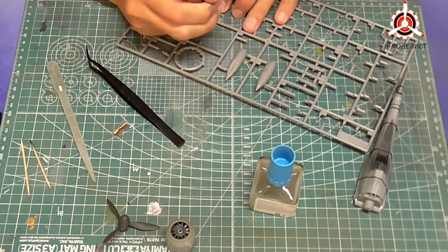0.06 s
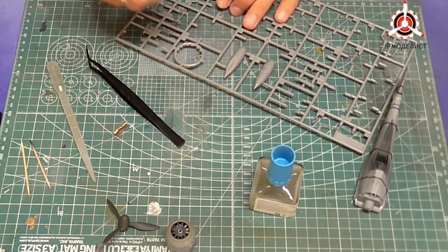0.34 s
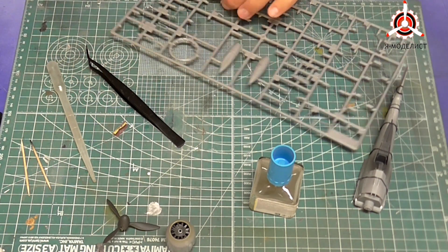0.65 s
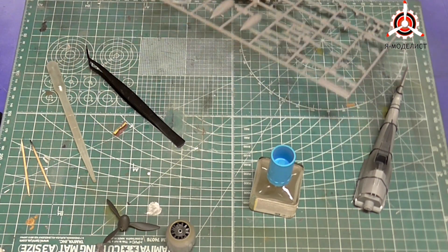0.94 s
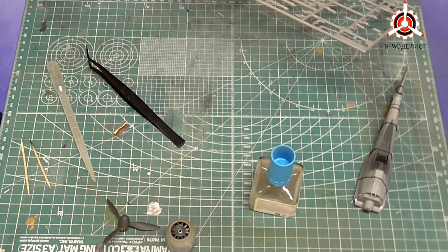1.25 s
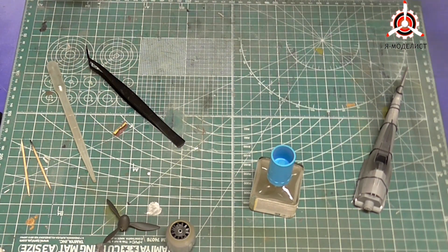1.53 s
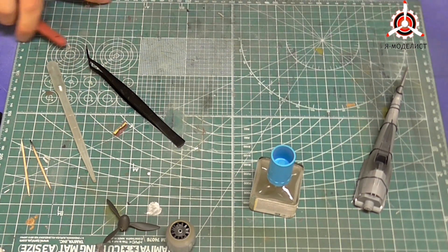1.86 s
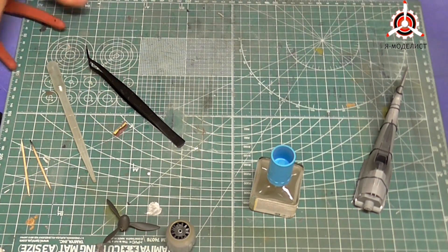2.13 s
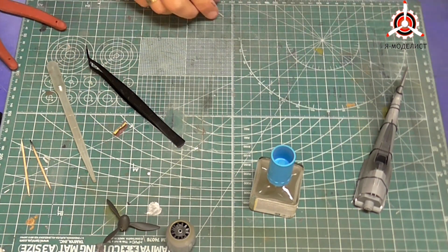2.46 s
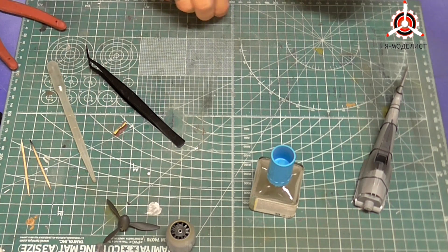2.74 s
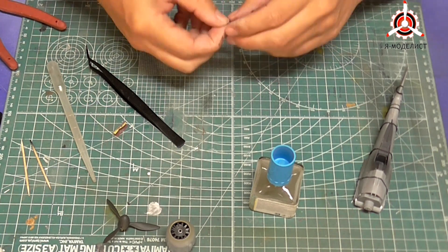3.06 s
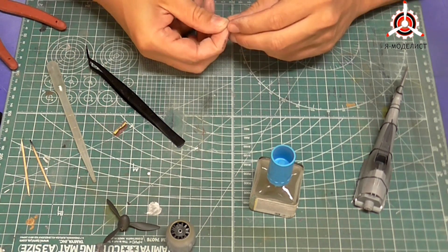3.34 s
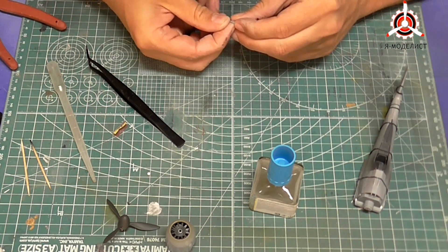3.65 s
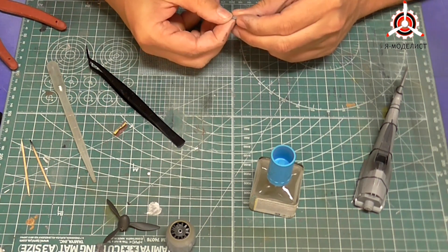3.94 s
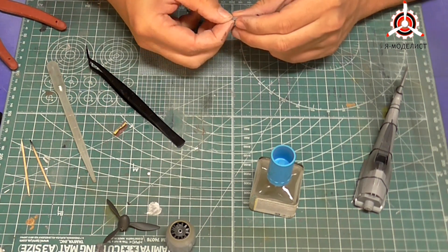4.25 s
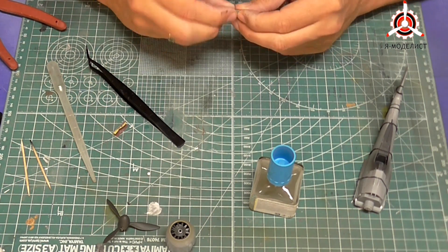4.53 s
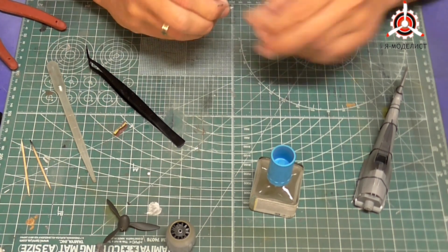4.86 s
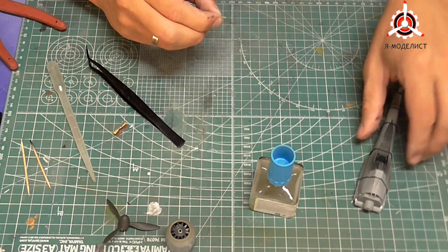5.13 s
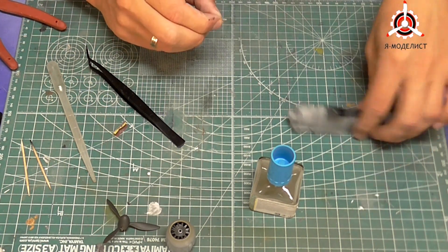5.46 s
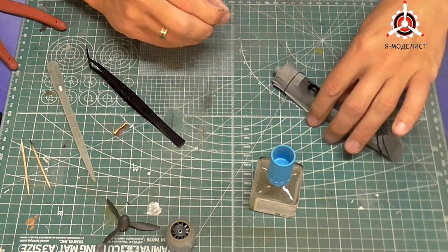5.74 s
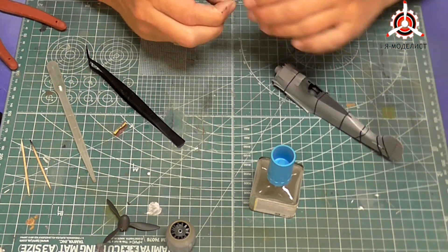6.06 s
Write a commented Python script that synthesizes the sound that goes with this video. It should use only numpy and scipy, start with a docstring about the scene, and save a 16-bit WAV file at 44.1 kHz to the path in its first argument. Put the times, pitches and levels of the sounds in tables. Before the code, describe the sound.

Small plastic clicks lead into a light, rasping slide of a model parts frame over a mat. Then comes the loudest sound, metal nippers clacking and thudding on the bench in quick bounces. Faint skin rubs and dull taps follow, until a hand lands on a plastic tool with a soft boom and swings it round, scraping and snapping. A close stereo microphone picks up steady hiss and the small room's rumble and echo.

```python
"""A modeller's bench in a small, echoing room. A sprue (the plastic frame that holds model parts) ticks
and scrapes as it is dragged off the cutting mat. Steel nippers are tossed aside and bounce to rest,
making the bench ring. Fingers fit two tiny parts, then a rotary tool is grabbed, making the room boom,
and slid over the mat. Each scrape is a stream of tiny slips; each bounce is a push and fading tones.
Under it all lie a low room rumble and the hiss of a close stereo microphone."""
import sys
import numpy as np
from scipy import signal
from scipy.fft import rfft, irfft
from scipy.io import wavfile

SR = 44100
rng = np.random.default_rng(int(sys.argv[2]) if len(sys.argv) > 2 else 0)


def pcm_store(signal):
    """Save signal as 16-bit PCM."""
    levels = np.round(np.clip(np.atleast_2d(signal), -1, 1) * 32767)
    wavfile.write(sys.argv[1], SR, levels.astype(np.int16).T)


N = 269010
T = np.arange(N) / SR
LEFT_RIGHT = np.array([[1], [-1]])  # adds to the left ear, takes away from the right

# Levels in the tables are relative: the functions set the final loudness.
# Tone colours, or how strong each pitch is. Each row: frequency in Hz, level in dB.
BACKGROUND_COLOUR = [(20, -9), (55, -10.5), (100, 1.5), (160, -0.5), (250, -3.5), (450, -8.5), (1000, -14),
                     (2000, -18), (2900, -26), (3900, -18.5), (5400, -22.5), (8200, -23), (12500, -24),
                     (15700, -27)]  # room rumble and microphone hiss
RUSH_COLOUR = [(18, -49), (30, -22), (168, -10.5), (213, -9.5), (263, -10), (332, -11.5), (532, -12),
               (1290, -17.5), (2990, -32.5), (3880, -31), (15500, -38.5)]  # a soft, wide rush
SPRUE_COLOUR = [(120, -14.5), (250, -9.5), (370, -4), (560, -11), (850, -8), (1100, -1), (1400, 4),
                (2000, -2), (2700, -6), (3500, -8.5), (4600, -6.5), (6200, -2.5), (9000, -8.5),
                (15500, -17.5)]  # plastic frame on the mat
BRUSH_COLOUR = [(150, 10), (540, -32), (1000, -3), (1900, -6.5), (2600, -13.5), (3300, -12), (7500, -1),
                (15500, -10)]  # skin on the mat
RUB_COLOUR = [(70, 12.5), (150, -13.5), (320, 1), (520, -5), (700, -11.5), (1150, -4.5), (1600, -14),
              (2800, -32.5), (15500, -42)]  # rubbing fingers
THUD_COLOUR = [(30, -20), (70, -5), (120, -5.5), (250, -0.5), (550, -1), (1000, -5.5), (1600, -6),
               (3000, -42.5), (9000, -39)]  # a blow on the bench
CLACK_COLOUR = [(100, -20), (600, -8), (1400, 0), (2200, -1), (3000, 1), (5000, 0), (7000, 0), (8200, -5),
                (9500, -12), (11000, -14), (16000, -25)]  # a blow on steel
TOOL_COLOUR = [(120, -25.5), (330, -4.5), (600, -11), (1000, -4.5), (1600, 2), (2700, -3.5), (3600, -2),
               (5600, 4), (7800, 0.5), (9200, -1), (10500, -4.5), (15500, -17)]  # the tool's housing on the mat

# Narrow ranges of pitch that stand out. Each row: centre in Hz, width in Hz, boost in dB.
BUZZ_PEAKS = [(4520, 81, 2.7), (6340, 610, 1.86), (9520, 850, 1.8), (11240, 200, 2.2)]
SPRUE_PEAKS = [(310, 17, 9.2), (770, 130, 5.8), (1053, 11, 8.2), (1310, 83, 1.2), (2030, 52, 6.3),
               (3400, 110, 3.8)]
TOOL_PEAKS = [(860, 50, 4), (1400, 80, 4), (2170, 130, 7), (3550, 200, 3), (5300, 150, 3), (5750, 280, 4.5),
              (8700, 450, 4)]

# Short strokes. Each row: start in seconds, length in seconds, level in dB.
SPRUE_NUDGES = [(-.05, 0.086, -49), (.37, 0.095, -58.5)]  # small pushes before the drag
FINGER_SWISHES = [(.27, .13, -68), (.5, 0.1, -60)]  # a fingertip along the sprue
SKIN_BRUSHES = [(1.825, 0.065, -63.5), (3.005, 0.13, -71)]  # skin across the mat
# Fingers rub, then a forearm shifts.
# Each row: start in seconds, length in seconds, level in dB, rumble in dB compared with the middle range.
RUBS = [(2.723, 0.054, -60, -11), (3.205, 0.069, -61, 9), (3.325, .1, -62.5, 5), (4.94, 0.059, -67, -4),
        (5.017, 0.059, -69, 17)]

# Long slides. Each row: time in seconds, level in dB, treble in dB compared with the middle range.
SPRUE_DRAG = [(.66, -57.5, -29), (.74, -57.5, -2.5), (.795, -49.5, -9), (.87, -57, -4), (.925, -45, -11.5),
              (1.015, -47, -11.5), (1.06, -41.5, -6.5), (1.11, -52.5, -23), (1.22, -56.5, -13),
              (1.4, -78.5, 12)]
TOOL_SWING = [(5.31, -57, -5), (5.37, -48, -4.5), (5.43, -46, 5.5), (5.485, -41.5, -7), (5.545, -50, -5),
              (5.565, -44, -6), (5.63, -49.5, -3), (5.745, -44, 1.5), (5.8, -69, 0)]
# The sliding sprue sings thinly. Each row: time in seconds, pitch in Hz, level in dB.
SPRUE_SINGING = [(.7, 2020, -64), (1.1, 2006, -65), (1.3, 2022, -63), (1.7, 2022, -70.5), (1.8, 2000, -70),
                 (1.95, 1940, -81)]

# Small contacts. Each row: start in seconds, level in dB, centre pitch in Hz, width in octaves.
PLASTIC_TICKS = [(.263, -57, 1630, 0.66), (.408, -52.5, 1210, 1.4), (.537, -56, 1620, 0.61),
                 (.624, -51.5, 2030, 0.28), (.852, -53.5, 775, 0.11), (1.045, -50, 1350, 0.27),
                 (1.079, -48, 1314, 0.12), (2.661, -52.5, 1870, 0.56), (2.7404, -53, 1050, 0.71)]  # thin parts
DULL_KNOCKS = [(.01, -48, 151, 1.6), (.691, -49.5, 330, 1.04), (3.222, -50, 780, 1.17),
               (3.622, -48.5, 476, 2.53), (3.638, -46, 276, 2.1), (4.08, -56, 209, 1.08),
               (4.124, -59, 215, 1), (4.984, -53.5, 278, 3), (5.067, -50.5, 90, 1.6),
               (5.47, -45, 347, 0.86), (5.514, -46.5, 326, 1.3), (5.833, -49, 275, 0.96)]  # fingers and tool on the bench
# A plastic edge catches and snaps free. Each row: start in seconds, level in dB, lowest pitch in Hz.
EDGE_SNAPS = [(.692, -56.5, 1000), (.783, -55, 1000), (1.159, -53.5, 900), (5.475, -37.5, 4400),
              (5.479, -35.5, 4050), (5.556, -44.5, 1200)]

# The nippers land. Each row: start in seconds, bench thud in dB, steel clack in dB,
# and the frequency in Hz above which the clack is dulled.
BOUNCES = [(2.028, -27, -23, 10070), (2.0425, -20.5, -34, 4970), (2.083, -19, -48, 2470),
           (2.111, -37, -53, 2500), (2.1628, -23, -23.5, 6540), (2.19, -17.5, -36, 9000),
           (2.222, -21.5, -21.5, 9000), (2.276, -19.5, -41, 3500), (2.289, -30.5, -23.5, 5570)]
# The hand lands on the rotary tool. Each row: start in seconds, level in dB.
GRAB_PUSHES = [(5.2629, -36), (5.28, -41)]

# Tones that ring on after a blow. Each row: pitch in Hz, level in dB, seconds to fade by 60 dB.
BENCH_TONES = [(134, -2, .45), (158, -1, .5), (192, -4, .4), (263, -4, .4), (322, -2, .55), (377, -6, .55),
               (427, 0, .55), (492, -2, .5), (563, -4, .45), (703, -9, .35), (833, -8, .3), (926, -4, .4),
               (1038, -3, .5)]
STEEL_TONES = [(1276, -3, .3), (1421, 1, .35), (1475, -2, .25), (1550, -2, .25), (1675, -5, .3),
               (2700, -1, .2), (2957, -2, .25), (3160, -1, .2), (4045, -1, .2), (4520, -3, .2),
               (4908, 0, .2), (5262, -2, .2), (6070, -4, .15), (6760, 0, .15), (7490, -5, .15)]  # jaws and spring
ROOM_BOOM_TONES = [(128.5, 11.5, 0.87), (221, -12, .14), (420, -8, 0.43), (770, 4.5, 0.3)]  # the room's low boom after the grab

# How long the room echoes. Each row: frequency in Hz, seconds to fade by 60 dB (called t60 below).
ROOM_FADE = [(100, .55), (500, .55), (1600, .62), (4500, .56), (8000, .45), (15000, .31)]
# How wide the echoes are. Each row: frequency in Hz, level in dB of the part that is opposite
# in the two ears, compared with the part they share.
ROOM_WIDTH = [(100, -13), (250, -13), (500, -9), (1000, -7.5), (4000, -6.5), (8000, -3), (14000, -2)]


def gain(db):
    """Turn decibels into a number to multiply by."""
    return 10 ** (np.asarray(db) / 20)


def unit_power(x):
    """Scale a steady sound to an average power of one."""
    return x / np.sqrt(np.mean(x ** 2))


def unit_hit(x):
    """Give a short sound the energy of 10 ms at a power of one."""
    return x * np.sqrt(SR / 100 / np.sum(x ** 2))


def value_at(points, hz):
    """Read between (Hz, value) rows, with every octave equally wide."""
    row_hz, values = np.transpose(points)
    return np.interp(np.log(hz + 1e-3), np.log(row_hz), values)


def frequencies(x):
    """The frequencies in the spectrum of x, in Hz."""
    return np.fft.rfftfreq(len(x), 1 / SR)


def peak_gain(peaks, hz):
    """A bell-shaped boost around each peak."""
    return gain(sum(db * np.exp(-((hz - centre) / width) ** 2) for centre, width, db in peaks))


def colour(x, points, peaks=()):
    """Give a sound a tone colour, with any peaks on top."""
    hz = frequencies(x)
    return irfft(rfft(x) * gain(value_at(points, hz)) * peak_gain(peaks, hz), len(x))


def band(x, hz, kind="bandpass", order=2):
    """Keep what lies between two frequencies, or below or above one."""
    edges_hz = np.sort(np.clip(np.atleast_1d(hz), 10, SR / 2 - 100)).squeeze()
    return signal.sosfilt(signal.butter(order, edges_hz, kind, fs=SR, output="sos"), x)


def burst(t60):
    """A second of fading noise with an energy of one."""
    noise = rng.standard_normal(SR) * np.exp(-np.log(1000) * T[:SR] / t60)
    return noise / np.sqrt(np.sum(noise ** 2))


def echoes(early_db=-3, early_t60=0.072, build_s=0.0009):
    """Quick echoes come from bench and shelves, then a tail from the walls, whose treble dies first."""
    noise = rng.standard_normal(SR)
    spectrum, centres_hz = rfft(noise), np.geomspace(100, 16000, 8)
    tail = 0
    for hz, share in zip(centres_hz, np.eye(len(centres_hz))):
        noise_band = irfft(spectrum * value_at(np.c_[centres_hz, share], frequencies(noise)), SR)
        tail = tail + noise_band * np.exp(-np.log(1000) * T[:SR] / value_at(ROOM_FADE, hz))
    tail = tail * (1 - np.exp(-T[:SR] / build_s))
    return tail / np.sqrt(np.sum(tail ** 2)) + gain(early_db) * burst(early_t60)


def room(x, echo_db, pan_db):
    """A sound plus its echoes, in stereo. A positive pan moves it to the left."""
    response = echoes() + LEFT_RIGHT * colour(echoes(), ROOM_WIDTH)
    reflected = signal.fftconvolve(x[None], response, axes=1)[:, :N]
    return (x + gain(echo_db) * reflected) * gain(LEFT_RIGHT * pan_db / 2)


def background(hiss_db=-63, rush_db=-60, buzz_db=-74, mains_hz=50, buzz_fade_s=0.0035):
    """Room rumble, microphone hiss, a faint mains buzz, and a soft rush opposite in the two ears."""
    rumble_and_hiss = unit_power(colour(rng.standard_normal(N), BACKGROUND_COLOUR))
    rush = unit_power(colour(rng.standard_normal(N), RUSH_COLOUR))
    # a few narrow bands of hiss swell on every cycle of the mains power
    swell = .7 + np.exp(-(T % (1 / mains_hz)) / buzz_fade_s)
    pulsing = rng.standard_normal(N) * swell
    peaks_only = peak_gain(BUZZ_PEAKS, frequencies(T)) - 1
    buzz = unit_power(irfft(rfft(pulsing) * peaks_only, N))
    return gain(hiss_db) * rumble_and_hiss + gain(buzz_db) * buzz + gain(rush_db) * LEFT_RIGHT * rush


def strokes(rows, rise_s=0.024, fade_s=0.021):
    """The loudness of short strokes: each rises, holds and dies away."""
    loudness = np.zeros(N)
    for start, length, db in rows:
        rise = np.clip((T - start) / rise_s, 0, 1)
        fade = np.exp(-np.maximum(T - start - length, 0) / fade_s)
        loudness += gain(db) * rise * fade
    return loudness


def drag(rows, edge_s=0.031):
    """The loudness of a long slide, and its treble in dB, from moment to moment."""
    times, db, treble_db = np.transpose(rows)
    touching = np.interp(T, [times[0] - edge_s, times[0], times[-1], times[-1] + edge_s], [0, 1, 1, 0])
    return touching * gain(np.interp(T, times, db)), np.interp(T, times, treble_db)


def friction(tone, rumble_db, treble_db, slips_per_s, spread_db, judder_db, peaks=(), judder_hz=90):
    """Tiny slips shake a sliding thing, swelling and fading as it catches and lets go."""
    sizes = gain(spread_db * np.minimum(rng.exponential(size=N), 3))
    slips = (rng.random(N) < slips_per_s / SR) * rng.choice([-1, 1], N) * sizes
    catching = np.tanh(np.interp(T * judder_hz, np.arange(N), rng.standard_normal(N)))
    body = colour(slips * gain(judder_db * catching), tone, peaks)
    rumble = unit_power(band(body, [90, 700], order=4))
    middle = unit_power(band(body, [700, 4000], order=4))
    treble = unit_power(band(body, 4000, "highpass", order=4))
    return middle + gain(rumble_db) * rumble + gain(treble_db) * treble


def sprue_singing(waver_hz=80):
    """One bar of the sliding frame rasps: a narrow band of noise around a drifting pitch."""
    times, hz, db = np.transpose(SPRUE_SINGING)
    waver = band(rng.standard_normal(N) + 1j * rng.standard_normal(N), waver_hz, "lowpass")
    phase = 2 * np.pi * np.cumsum(np.interp(T, times, hz)) / SR
    rasp = unit_power(np.real(waver * np.exp(1j * phase)))
    return rasp * np.interp(T, times, gain(db), left=0, right=0)


def sprue(nudge_treble_db=-4, swish_hz=(5700, 6900)):
    """The plastic frame scrapes over the mat, less boomy the faster it goes; skin swishes along it."""
    speed, treble_db = drag(SPRUE_DRAG)
    speed = speed + strokes(SPRUE_NUDGES)
    treble_db = np.where(T < SPRUE_DRAG[0][0], nudge_treble_db, treble_db)
    slowness_db = -20 * np.log10(np.maximum(speed / speed.max(), .1))
    scrape = speed * friction(SPRUE_COLOUR, rumble_db=-10.5 + 0.59 * slowness_db, treble_db=treble_db,
                              slips_per_s=1519, spread_db=2, judder_db=3, peaks=SPRUE_PEAKS)
    singing = sprue_singing()
    narrow_hiss = unit_power(band(rng.standard_normal(N), swish_hz))
    broad_hiss = unit_power(band(rng.standard_normal(N), [4500, 12000]))
    swish = strokes(FINGER_SWISHES) * (narrow_hiss + gain(1) * broad_hiss)
    return room(gain(-3.5) * scrape + swish + gain(-8.5) * singing, echo_db=-2.5, pan_db=0)


def rattle(x, t60):
    """Spread a blow over a quick run of tiny contacts."""
    return signal.fftconvolve(x, burst(t60))[:len(x)]


def knock(edges_hz, scuff_t60=0.022):
    """A small, short knock that scuffs as it lands."""
    tap = unit_hit(band(signal.unit_impulse(SR // 10), edges_hz, order=3))
    scuff = unit_hit(rattle(tap, scuff_t60))
    return unit_hit(tap + scuff)


def add(track, start, sound):
    """Mix a sound into the track, with its start given in seconds."""
    i = max(int(start * SR), 0)
    track[i:i + len(sound)] += sound[:N - i]


def taps(snap_top_hz=9440):
    """Thin parts tick, fingertips knock low and dull, and catching edges snap brightly."""
    track = np.zeros(N)
    for start, db, hz, octaves in PLASTIC_TICKS + DULL_KNOCKS:
        edges_hz = hz * 2 ** (octaves * np.array([-.5, .5]))
        add(track, start, gain(db) * knock(edges_hz))
    for start, db, low_hz in EDGE_SNAPS:
        add(track, start, gain(db) * knock([low_hz, snap_top_hz]))
    return room(gain(-1) * track, echo_db=-0.5, pan_db=0.5)


def hands():
    """Skin brushes the mat, fingers rub two parts together, and a forearm shifts."""
    brush = friction(BRUSH_COLOUR, rumble_db=1, treble_db=4,
                     slips_per_s=12200, spread_db=2.5, judder_db=3.5)
    brush = band(brush * strokes(SKIN_BRUSHES), 220, "highpass")
    starts, lengths, db, rumble_db = np.transpose(RUBS)
    rub = friction(RUB_COLOUR, rumble_db=np.interp(T, starts, rumble_db), treble_db=-25,
                   slips_per_s=1160, spread_db=0, judder_db=8)
    rub = band(rub * strokes(zip(starts, lengths, db)), 167, "highpass")
    return room(gain(-1) * brush + gain(-2) * rub, echo_db=-0.5, pan_db=0.1)


def sharp_pulse(tone, size=4096):
    """The sharpest blow that has this tone colour, padded to one second."""
    log_spectrum = np.log(gain(value_at(tone, np.fft.rfftfreq(size, 1 / SR))))
    # folding the second half onto the first packs the energy at the start
    cepstrum = irfft(log_spectrum)
    cepstrum[1:size // 2] *= 2
    cepstrum[size // 2 + 1:] = 0
    pulse = irfft(np.exp(rfft(cepstrum)))
    return unit_hit(np.pad(pulse, (0, SR - size)))


def ring(tones, scatter_db):
    """A blow sets off fading tones; chance in their strengths stands in for where it lands."""
    hz, db, t60 = np.transpose(tones)[:, :, None]
    t = T[:SR * 2 // 3]
    strengths = gain(db + scatter_db * rng.standard_normal(db.shape))
    fades = np.exp(-np.log(1000) * t / t60)
    ringing = np.sum(strengths * np.cos(2 * np.pi * hz * t) * fades, axis=0)
    return unit_hit(band(np.pad(ringing, (0, SR - len(t))), [hz.min() / 2, hz.max() * 1.2]))


def rocking(count=5, start=2.321, gap_s=0.023, fall_db=4, thud_db=-24.5, clack_db=-29, bright_hz=4600):
    """The nippers rock to rest: more rows like BOUNCES, each weaker than the last."""
    return [(start + k * gap_s, thud_db - k * fall_db, clack_db - k * fall_db, bright_hz)
            for k in range(count)]


def nippers(contact_t60=0.0075, chatter_t60=0.034, second_jaw_s=0.0053, clank_s=2.189):
    """Each bounce thuds the bench and clacks both jaws, and the loose joint chatters for a moment."""
    hits, boom = np.zeros(N), np.zeros(N)
    thud, clack = sharp_pulse(THUD_COLOUR), sharp_pulse(CLACK_COLOUR)
    for start, thud_db, clack_db, bright_hz in BOUNCES + rocking():
        ringing = gain(-14) * ring(STEEL_TONES, scatter_db=4)
        first_jaw = unit_hit(rattle(clack, contact_t60))
        chatter = rattle(clack, chatter_t60)
        second_jaw = gain(-2) * unit_hit(rattle(clack, contact_t60))
        steel = first_jaw + ringing + chatter
        add(steel, second_jaw_s, second_jaw[:SR // 2])
        # a landing on the soft grips sounds duller
        add(hits, start, gain(clack_db) * band(steel, bright_hz, "lowpass", order=1))
        add(hits, start, gain(thud_db) * unit_hit(rattle(thud, t60=0.018)))
        add(boom, start, gain(thud_db - 5) * ring(BENCH_TONES, scatter_db=3.5))
    crack = unit_hit(band(clack, 1670, "highpass"))  # bare steel lands first
    add(hits, BOUNCES[0][0], gain(-20) * crack)
    hits *= gain(-9)
    add(hits, clank_s, gain(-26.5) * knock(edges_hz=(850, 1102)))  # one handle clanks
    return band(room(hits, echo_db=2.5, pan_db=-0.65) + boom, 95, "highpass")


def tool_grab(slap_db=-49, slap_hz=(400, 2970)):
    """The hand slaps the rotary tool, which rocks; the thump sets off a low, lingering room boom."""
    hits, boom = np.zeros(N), np.zeros(N)
    push = unit_hit(band(signal.unit_impulse(SR), [110, 330]))
    for start, db in GRAB_PUSHES:
        add(hits, start, gain(db) * push)
    first_s, first_db = GRAB_PUSHES[0]
    add(hits, first_s, gain(slap_db) * knock(slap_hz))
    add(boom, first_s, gain(first_db - 2) * ring(ROOM_BOOM_TONES, scatter_db=0))
    return room(hits, echo_db=-4.5, pan_db=-0.5) + boom


def tool_slide():
    """The tool's plastic housing is swung round on the mat, catching on its grain."""
    speed, treble_db = drag(TOOL_SWING)
    scrape = speed * friction(TOOL_COLOUR, rumble_db=-7.5, treble_db=treble_db,
                              slips_per_s=1780, spread_db=2, judder_db=4.5, peaks=TOOL_PEAKS)
    return room(gain(-3) * scrape, echo_db=-3.5, pan_db=-0.2)


def scene():
    """The blows, the scrapes and the background together, in stereo."""
    blows = nippers() + taps() + tool_grab()
    scrapes = sprue() + hands() + tool_slide()
    return blows + scrapes + background()


def record(dry):
    """Cut away the very highest treble, above 15800 Hz."""
    return signal.sosfilt(signal.ellip(10, .2, 70, 15800, fs=SR, output="sos"), dry)


dry = scene()
out = record(dry)
pcm_store(out)
```